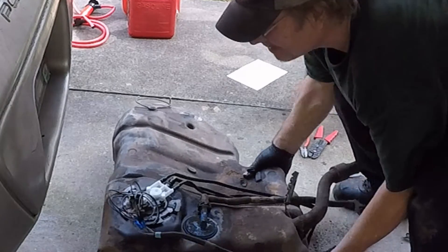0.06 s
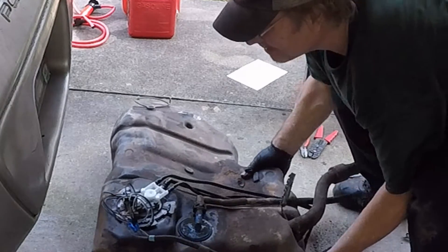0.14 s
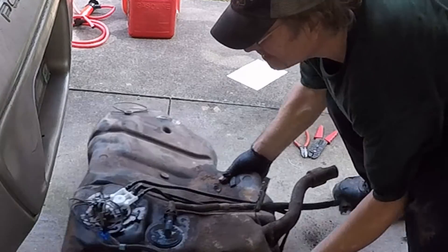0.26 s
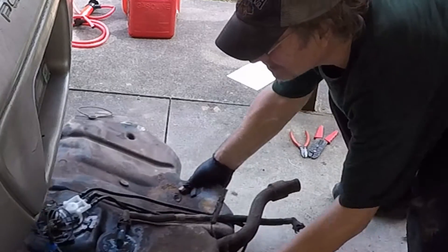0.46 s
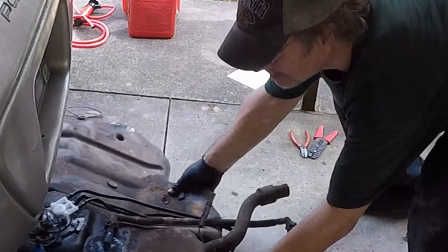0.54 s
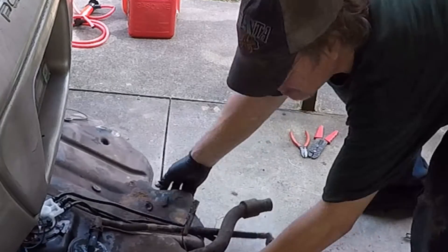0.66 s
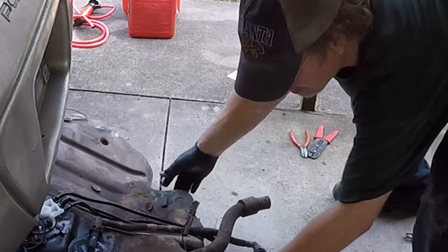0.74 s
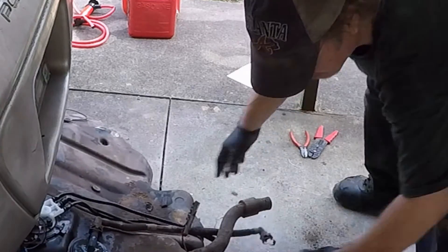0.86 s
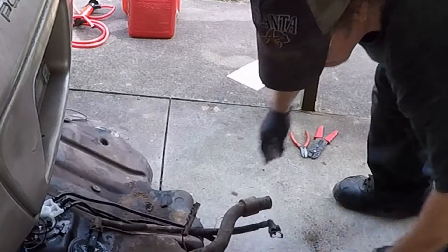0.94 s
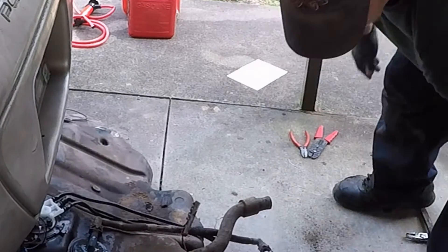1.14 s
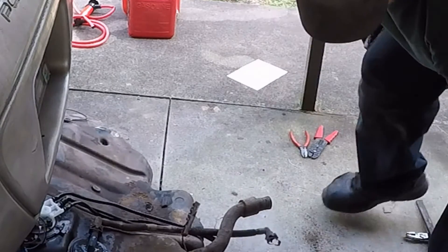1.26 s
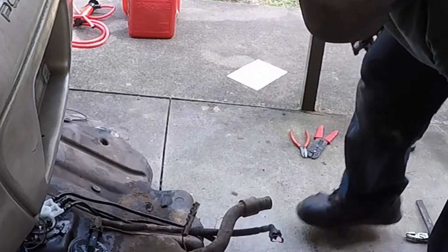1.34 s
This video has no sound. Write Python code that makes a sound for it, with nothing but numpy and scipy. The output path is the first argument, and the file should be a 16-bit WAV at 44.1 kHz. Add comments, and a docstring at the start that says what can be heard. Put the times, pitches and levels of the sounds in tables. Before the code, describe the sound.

A hollow fuel tank is dragged over gritty concrete close by, rasping and groaning, then tips down with a crunch and a low boom and rocks to rest. A shoe scuffs with a small steel clink over faint insect hiss.

```python
"""Outdoors on gritty concrete: a hollow fuel tank is dragged, tips down with a crunch and rocks to rest.
Grit rasps under its edge, which catches and groans in stick-slip; friction keeps the shell droning.
Landing blows ring the shell and its panels, and a low boom swells and sinks to a rumble.
Loose steel clinks at the landing and again as a shoe scuffs. Insects hiss over steady air."""
import sys
import numpy as np
from scipy import signal
from scipy.fft import rfft, irfft
from scipy.io import wavfile

SR = 44100
rng = np.random.default_rng(int(sys.argv[2]) if len(sys.argv) > 2 else 0)


def wav_out(sig):
    """Save sig, one row per channel (or a flat mono array), as 16-bit PCM at SR to the path in sys.argv[1]."""
    wavfile.write(sys.argv[1], SR, np.round(np.clip(np.atleast_2d(sig).T, -1, 1) * 32767).astype(np.int16))


N = 61739
T = np.arange(N) / SR
HZ = np.fft.rfftfreq(N, 1 / SR)

# stereo coherence of near sources: f/Hz, coherence/0-1
NEAR_COHERENCE = [(130, 0.94), (290, 0.98), (630, 0.6), (1400, 0.42), (3000, 0.86), (6500, 0.53),
                  (14000, 0)]


def amp(db):
    """dB to gain."""
    return 10 ** (np.asarray(db) / 20)


def unit_rms(x):
    """Scale to rms 1."""
    return x / np.sqrt(np.mean(x ** 2) + 1e-20)


def at_hz(points, hz=HZ):
    """Interpolate a table over log frequency."""
    f, values = np.transpose(points)
    return np.interp(np.log(hz + 1), np.log(f + 1), values)


def envelope(points):
    """Gain over time from t/s, level/dB points."""
    return amp(np.interp(T, *np.transpose(points)))


def pan(db):
    """Channel gains for a left-right difference."""
    return amp(np.array([[db / 2], [-db / 2]]))


def add(mix, start_s, sound):
    """Mix a sound in at start_s."""
    part = mix[..., max(round(start_s * SR), 0):]
    part += sound[..., :part.shape[-1]]


def colour(pair, gain, coherence=NEAR_COHERENCE):
    """Filter two independent signals into partly coherent stereo, rms 1."""
    a, b = rfft(pair)
    c = np.clip(at_hz(coherence), -1, 1)
    mid, side = a * np.sqrt(1 + c), b * np.sqrt(1 - c)
    return unit_rms(irfft(np.array([mid + side, mid - side]) * gain, N))


def noise():
    """Two channels of white noise."""
    return rng.standard_normal((2, N))


def wander(rate_hz):
    """Random motion up to about rate_hz, rms 1."""
    return unit_rms(irfft(rfft(rng.standard_normal(N)) * np.exp(-(HZ / rate_hz) ** 2), N))


def grit(spectrum, grains_per_s=5000, spread_db=0.5):
    """Tiny fractures: filtered impulses of random size and timing."""
    size = amp(spread_db * np.minimum(rng.exponential(1, N), 4))
    grains = noise() * size * (rng.random(N) < grains_per_s / SR)
    return colour(grains, amp(at_hz(spectrum)))


def drag():
    """Grit rasps and sand crackles under the juddering edge."""
    # drag pressure: t/s, level/dB
    pressure = [(0, -52), (.1, -20), (.125, -11), (.19, -6.5), (.23, 1), (.27, -0.5), (.33, 0.5), (.38, -2),
                (.44, -2.5), (.475, 1.5), (.53, -2), (.565, -6.5), (.6, -2.5), (.66, 3.5), (.71, 1),
                (.77, -5.5), (.82, -19), (.9, -51)]
    # grit and sand spectra: f/Hz, density/dB
    rasp_spectrum = [(40, -51), (130, 5), (220, 3), (420, -3.5), (800, -5.5), (1300, -8), (2100, -10),
                     (2800, -15), (3700, -15), (4400, -19), (5500, -17), (6600, -13), (8200, -24),
                     (10200, -29.5), (11500, -40.5), (14000, -41)]
    sand_spectrum = [(1500, -24), (4000, 6), (7000, -2), (10000, -19), (14000, -20.5)]
    rasp = amp(-29.5) * grit(rasp_spectrum)
    sand = amp(-48) * grit(sand_spectrum, grains_per_s=330)
    judder = amp(0.9 * wander(50))
    return envelope(pressure) * judder * (rasp + sand)


def drone(waver=0.014, flutter_db=1.1):
    """Friction keeps the shell's resonances singing and wavering."""
    # sliding shell: f/Hz, width/Hz, level/dB
    resonances = [(156.9, 5.5, -2), (260, 14.4, -14.5), (341, 11.7, -17.5), (419.8, 13.6, -14),
                  (483, 14, -17), (760, 15.2, -19)]
    # drone envelope: t/s, level/dB
    swell = [(0, -56), (.075, -40), (.11, -51), (.17, -41), (.195, -34.5), (.215, -26), (.31, -28),
             (.39, -29), (.45, -37), (.51, -25), (.59, -31), (.62, -16.5), (.7, -17), (.74, -27.5),
             (.82, -44)]
    out = 0
    for hz, width_hz, db in resonances:
        cycles = np.cumsum(hz * (1 + waver * wander(2 * width_hz))) / SR
        out = out + amp(db + flutter_db * wander(2 * width_hz)) * np.sin(2 * np.pi * cycles)
    return envelope(swell) * unit_rms(out)


def groans(waver=0.037):
    """Brief stick-slip tones that sag as the edge picks up speed."""
    # slips: t/s, length/s, start f/Hz, end f/Hz, level/dB
    slips = [(.108, 0.03, 543, 495, -34), (.115, .05, 427, 378, -33.5), (.155, 0.045, 444, 380, -26),
             (.18, 0.039, 799, 775, -34.5), (.448, 0.065, 771, 613, -33), (.455, 0.048, 294, 250.5, -27)]
    out = np.zeros(N)
    for start_s, length_s, start_hz, end_hz, db in slips:
        progress = np.minimum(T / length_s, 1)
        hz = (start_hz + (end_hz - start_hz) * progress) * (1 + waver * wander(180))
        tone = np.sin(2 * np.pi * np.cumsum(hz) / SR)
        add(out, start_s, amp(db) * np.sin(np.pi * progress) * tone)
    return out


def crunch(db, rise_s, decay_s, pan_db):
    """A short burst of crushed grit."""
    # crushed grit: f/Hz, density/dB
    spectrum = [(60, -23), (250, 12.5), (600, -2.5), (1300, -2), (2200, -1), (3000, -4), (3900, -3.5),
                (4700, -3.5), (6400, -5), (8300, -15), (10500, -20.5), (14000, -35)]
    shape = np.minimum(T / rise_s, 1) * np.exp(-np.maximum(T - rise_s, 0) / decay_s)
    return amp(db) * pan(pan_db) * shape * grit(spectrum)


def edge_catches(rise_s=0.0029):
    """The tank's edge catches on grit and crushes it."""
    # catches: t/s, level/dB, decay/s, left-right/dB
    catches = [(0.0414, -33, 0.0082, 0.5), (0.1119, -27.5, 0.017, 0), (.1965, -30, 0.0045, 3),
               (0.302, -34, 0.0067, 0), (0.3717, -28.5, 0.012, -6), (0.4589, -30, 0.0092, 0),
               (.4873, -28.5, 0.0075, 0), (0.6107, -21.5, 0.022, 1.5), (0.6226, -17, 0.0067, 0)]
    out = np.zeros((2, N))
    for start_s, db, decay_s, pan_db in catches:
        add(out, start_s, crunch(db, rise_s, decay_s, pan_db))
    return out


def landing(bass_below_hz=120, panels_db=-11):
    """Each blow knocks a panel and rings the tank; a longer contact is duller, a flat one booms more."""
    # landing and rocking: t/s, level/dB, contact/s, bass/dB, knock f/Hz, knock level/dB
    blows = [(0.6098, -12.5, 0.001, -27, 544, -11.5), (0.6389, -10, 0.0011, 0, 915, -7),
             (0.648, -9, 0.00089, -1, 568, -13.5), (0.6607, -16, 0.0011, -2.5, 420, -8.5),
             (.680, -14.5, 0.0019, 2, 406, -13.5), (.692, -14.5, 0.00078, -14, 590, -25),
             (.713, -13.5, 0.0019, -9, 767, -13.5), (.726, -20, 0.0013, 12, 322, -14),
             (0.7537, -19.5, 0.00096, 7, 495, -24), (0.777, -24.5, 0.012, 10.5, 303, -26),
             (.789, -21, 0.0054, 7.5, 365, -17), (.854, -28, 0.0019, -3, 780, -25.5)]
    # tank modes: f/Hz, level/dB, t60/s
    modes = [(55.2, -7, 1.04), (97.6, -9.5, 0.45), (151.1, -10, 0.68), (168.8, -2.5, 0.31),
             (189.6, -9, 0.54), (252, -21, .35), (290.2, -14, 0.42), (333.2, -9.5, 0.3), (403, -9.5, 0.73),
             (483, -16.5, 0.56), (577, -11, 0.18), (696, -14.5, 0.2), (826, -24, 0.17), (911, -16, 0.32)]
    out = np.zeros((2, N))
    for start_s, db, contact_s, bass_db, knock_hz, knock_db in blows:
        force = np.exp(-T[:1024] * 2 * np.pi / contact_s) * T[:1024]
        shell = np.zeros(N)
        for hz, mode_db, t60_s in modes:
            decay = amp(mode_db - 60 * T / t60_s + bass_db * (hz < bass_below_hz))
            shell += decay * np.sin(2 * np.pi * hz * T)
        ring = shell + amp(panels_db) * panels()
        add(out, start_s, amp(db) * signal.oaconvolve(ring, force[None] / force.sum()))
        add(out, start_s, amp(knock_db) * knock(knock_hz))
    return out


def panels():
    """Crowded panel modes as decaying noise; the low mids ring longest."""
    # panel ring: f/Hz, density/dB
    spectrum = [(30, -40), (70, -10), (150, 0), (350, 1.5), (600, -8.5), (1000, -12.5), (1400, -3),
                (2500, -32), (6000, -36), (14000, -70)]
    # panel decay: f/Hz, t60/s
    ring_times = [(60, 0.43), (200, 0.78), (500, 0.71), (1200, 0.37), (6000, 0.39)]
    hz, t, bands = signal.stft(colour(noise(), amp(at_hz(spectrum))), SR, nperseg=512)
    decay = amp(-60 * t / at_hz(ring_times, hz)[:, None])
    return signal.istft(bands * decay, SR, nperseg=512)[1][:, :N]


def knock(hz, rise_s=0.0006, decay_s=0.0033, lower_ratio=0.638, lower_db=4):
    """The struck panel clangs for a few cycles on a pair of modes."""
    pair = np.sin(2 * np.pi * hz * T) + amp(lower_db) * np.sin(2 * np.pi * hz * lower_ratio * T)
    return np.minimum(T / rise_s, 1) * np.exp(-T / decay_s) * pair


def boom(hz=55, waver=0.042, flutter_db=2):
    """A low tone swells and wavers inside a soft rumble."""
    # boom envelope: t/s, level/dB
    swell = [(0, -67), (.27, -51), (.33, -42.5), (.46, -40.5), (.51, -32.5), (.62, -44), (.78, -16),
             (.95, -26.5), (1.08, -35.5), (1.14, -33), (1.27, -34), (1.39, -32.5)]
    # rumble: f/Hz, density/dB
    spectrum = [(18, -26), (34, -4), (50, -4), (70, -7.5), (92, -1.5), (125, -9.5), (165, -11.5),
                (260, -21), (600, -46), (2000, -74)]
    cycles = np.cumsum(hz * (1 + waver * wander(13))) / SR
    tone = amp(-1 + flutter_db * wander(12)) * np.sin(2 * np.pi * cycles)
    rumble = amp(-4.5) * colour(noise(), amp(at_hz(spectrum)))
    return envelope(swell) * pan(3) * (tone + rumble)


def clinks(rise_s=0.00022, phase_spread_rad=0.39):
    """A small loose steel part rings briefly."""
    # hits: t/s, level/dB
    hits = [(0.6121, -18.5), (1.3779, -28), (1.3848, -33)]
    # steel modes: f/Hz, level/dB, t60/s
    modes = [(1010, -4, 0.088), (2150, -9, 0.053), (2990, -11, 0.022), (3817, -2.5, 0.033),
             (5293, -10.5, 0.058), (5880, -11.5, .04)]
    attack = np.minimum(T / rise_s, 1)
    out = np.zeros((2, N))
    for start_s, db in hits:
        for hz, mode_db, t60_s in modes:
            phase = rng.uniform(0, 2 * np.pi) + phase_spread_rad * rng.standard_normal((2, 1))
            decay = amp(db + mode_db - 60 * T / t60_s)
            add(out, start_s, decay * attack * np.sin(2 * np.pi * hz * T + phase))
    return out


def shoe():
    """A sole scuffs grit on the concrete."""
    # scuff: t/s, level/dB, rise/s, decay/s, left-right/dB
    scuffs = [(1.3767, -29, 0.0044, .014, 1)]
    out = np.zeros((2, N))
    for start_s, db, rise_s, decay_s, pan_db in scuffs:
        add(out, start_s, crunch(db, rise_s, decay_s, pan_db))
    return out


def outdoors(flutter_db=1.1):
    """Steady air; insects hiss in narrow, fluttering noise bands."""
    # air: f/Hz, density/dB
    air_spectrum = [(25, -24), (70, -17), (160, 2.5), (230, -2.5), (330, -10.5), (470, -7.5), (650, -10.5),
                    (1000, -9), (1600, -12), (2600, -22.5), (3700, -21), (5200, -29), (8500, -39),
                    (10200, -28.5), (11500, -54), (14000, -42)]
    # insect bands: f/Hz, half-width/Hz, level/dB, left-right/dB
    insects = [(6814, 476, -42.5, -0.5), (3640, 130, -60.5, -4)]
    # stereo coherence of far sources: f/Hz, coherence/0-1
    coherence = [(130, 0.83), (290, 0.9), (630, 0.45), (1400, 0.087), (3000, 0.8), (6500, 0.049),
                 (14000, 0)]
    out = amp(-39) * pan(0.5) * colour(noise(), amp(at_hz(air_spectrum)), coherence)
    for hz, half_width_hz, db, pan_db in insects:
        band = 1 / (1 + ((HZ - hz) / half_width_hz) ** 2)
        out += amp(db + flutter_db * wander(40)) * pan(pan_db) * colour(noise(), band, coherence)
    return out


def scene():
    """Stereo mix of tank, steel, shoe and background."""
    sliding = drag() + drone() + groans() + edge_catches()
    return sliding + shoe() + clinks() + landing() + outdoors() + boom()


def record(dry):
    """Microphone balance, low cut, soft overload, band limit."""
    # microphone balance: f/Hz, left-right/dB
    balance = [(60, -2.5), (300, 0), (700, -.4), (1300, 0.5), (2300, 0), (4200, 1), (7800, -3.5),
               (14000, -1)]
    low_cut_hz, high_cut_hz = 33, 14400
    balance_db = at_hz(balance)
    heard = irfft(rfft(dry) * amp(np.array([balance_db, -balance_db]) / 2), N)
    heard = signal.sosfilt(signal.butter(2, low_cut_hz, "high", fs=SR, output="sos"), heard)
    heard = heard / (1 + heard ** 4) ** 0.25  # saturates at full scale
    lowpass = signal.firwin(511, high_cut_hz, window=("kaiser", 9), fs=SR)
    return signal.oaconvolve(heard, lowpass[None], "same")


dry = scene()
out = record(dry)
wav_out(out)
```